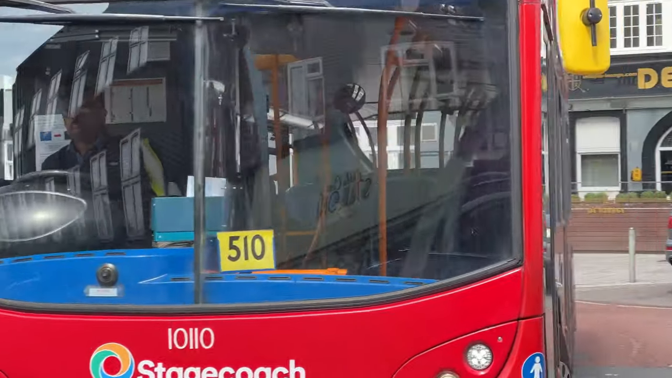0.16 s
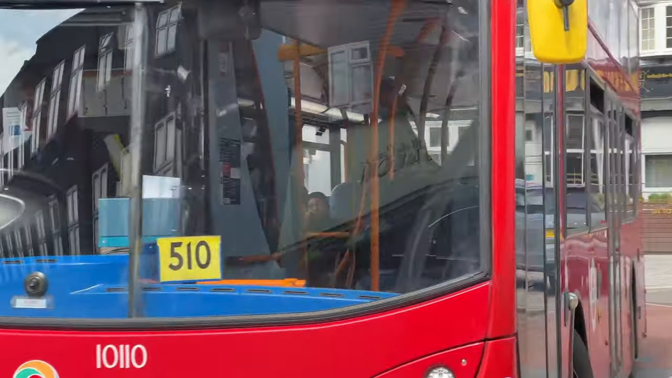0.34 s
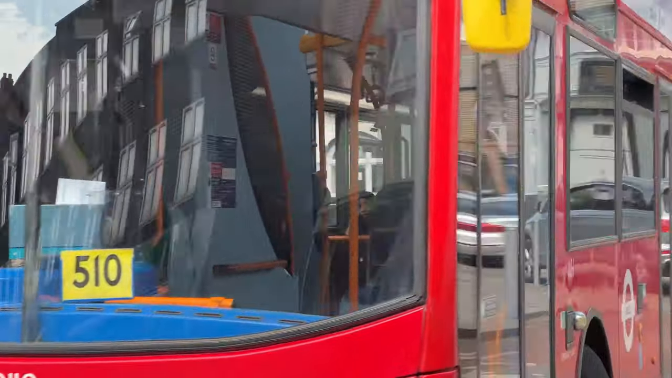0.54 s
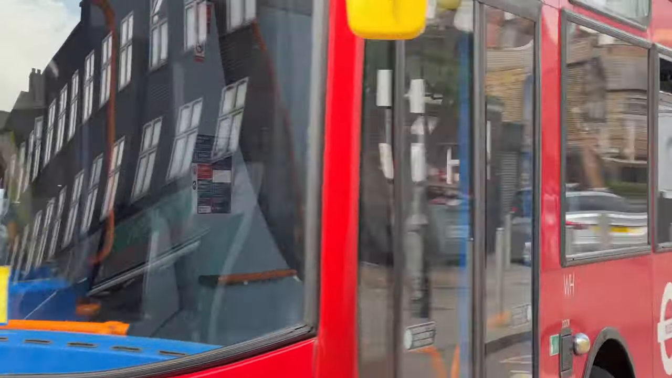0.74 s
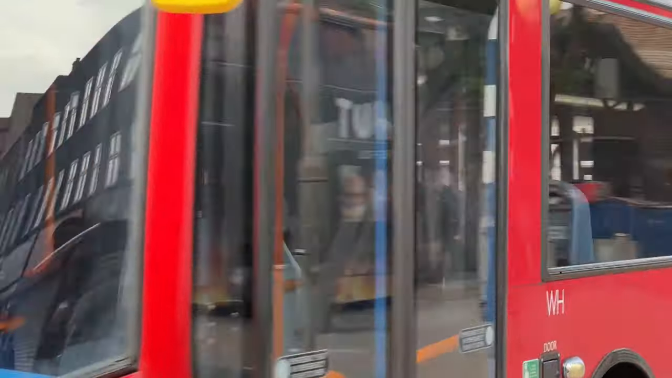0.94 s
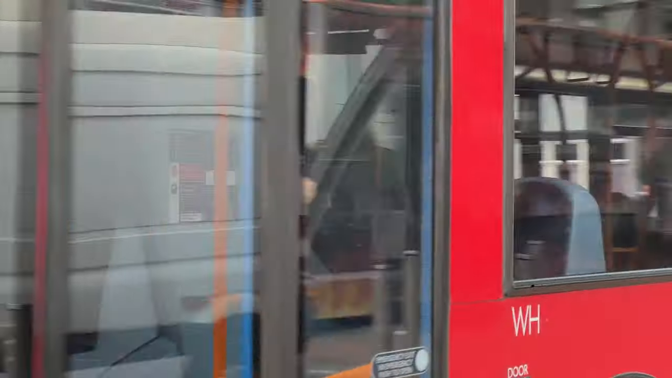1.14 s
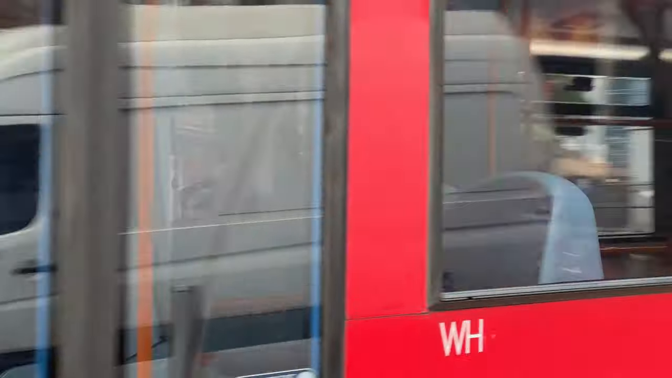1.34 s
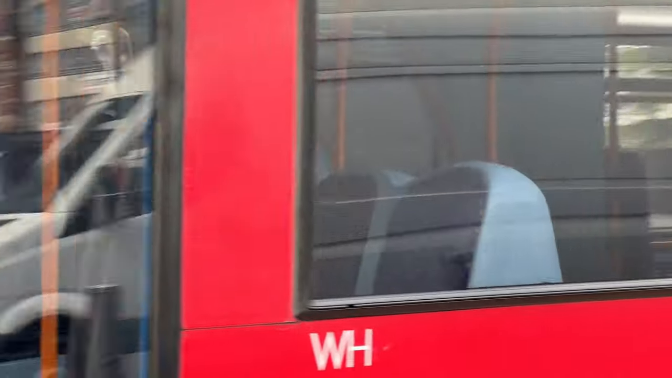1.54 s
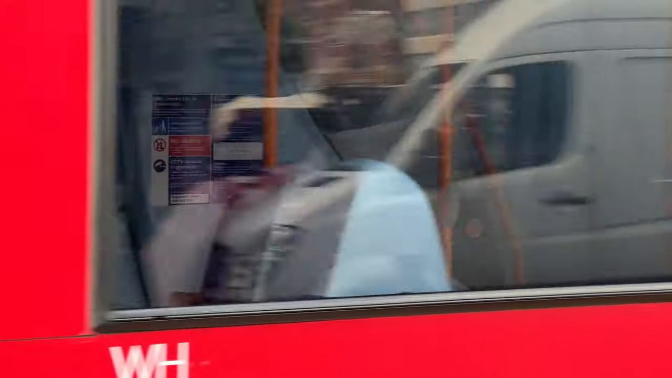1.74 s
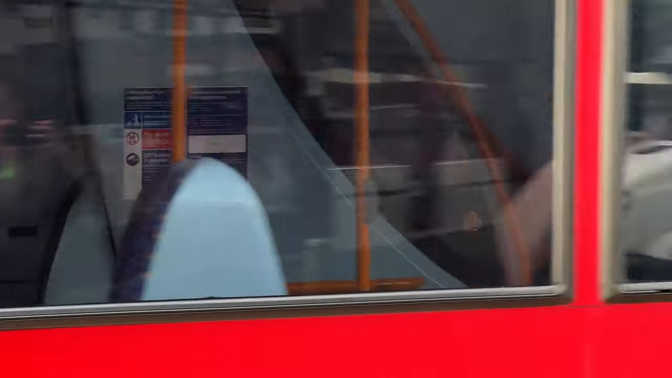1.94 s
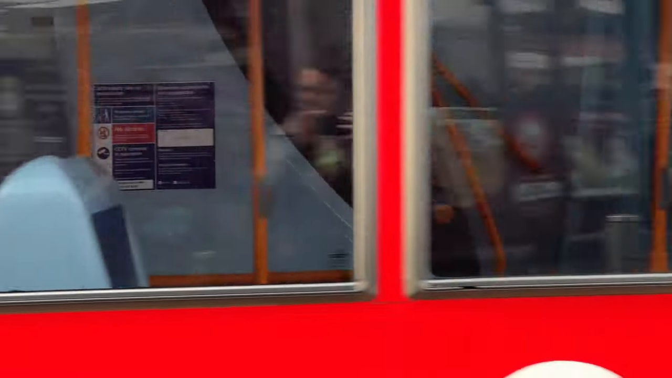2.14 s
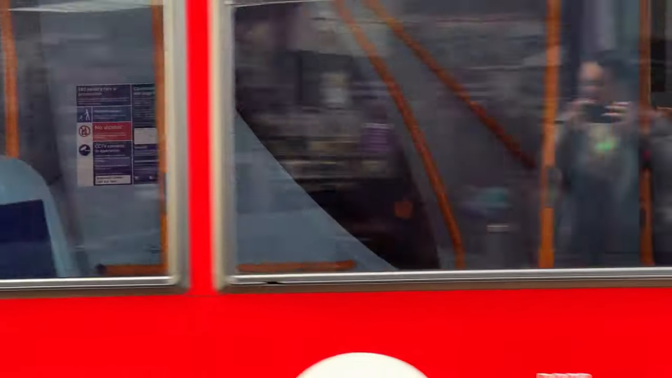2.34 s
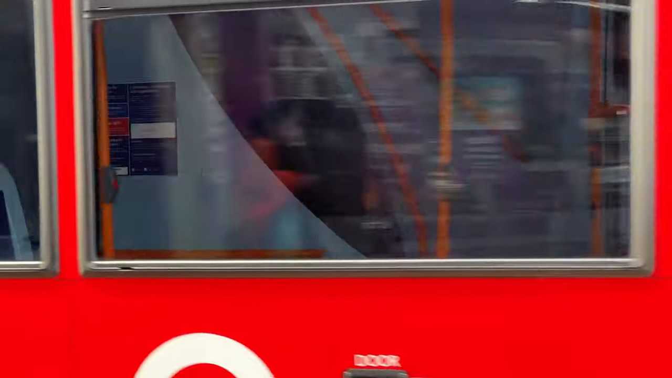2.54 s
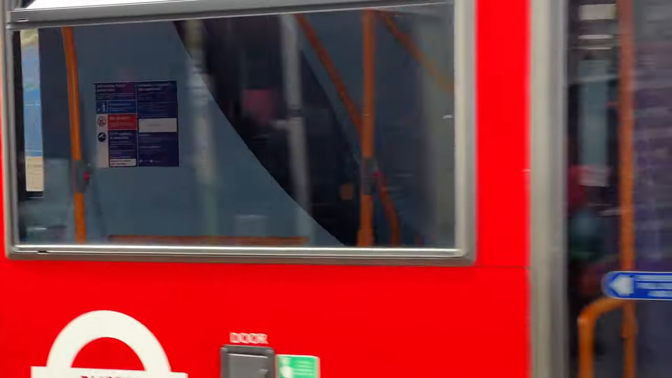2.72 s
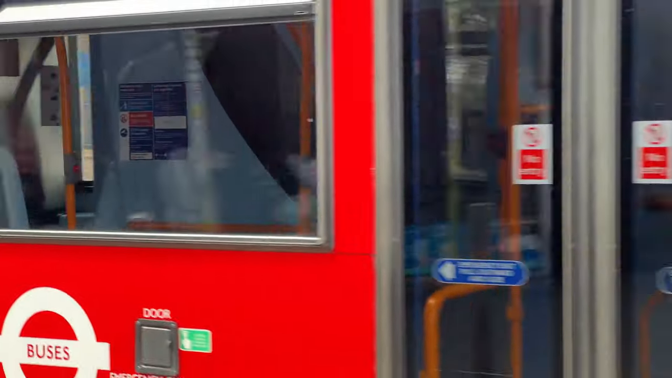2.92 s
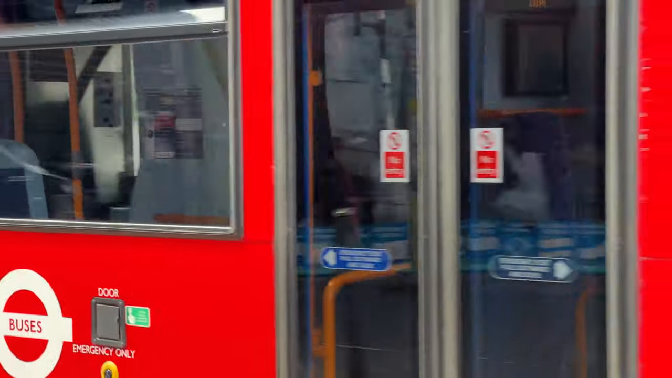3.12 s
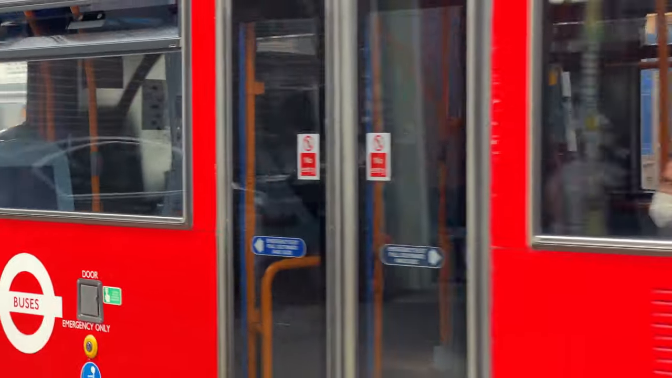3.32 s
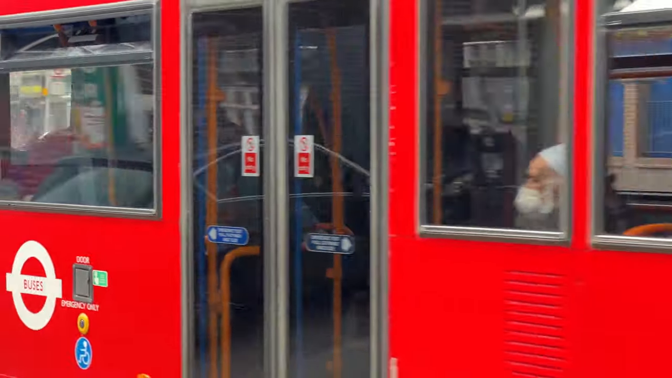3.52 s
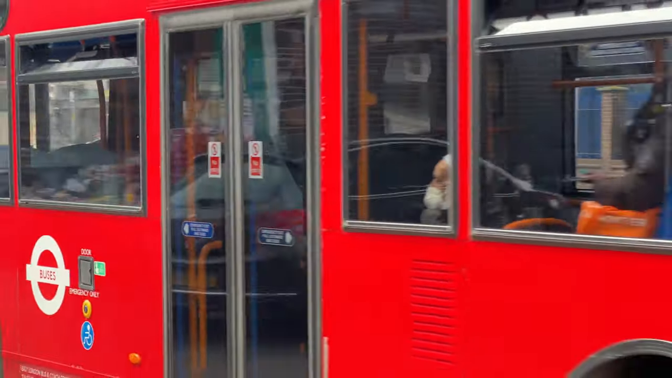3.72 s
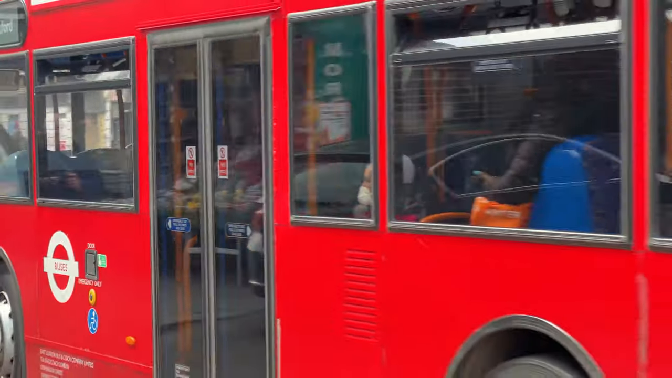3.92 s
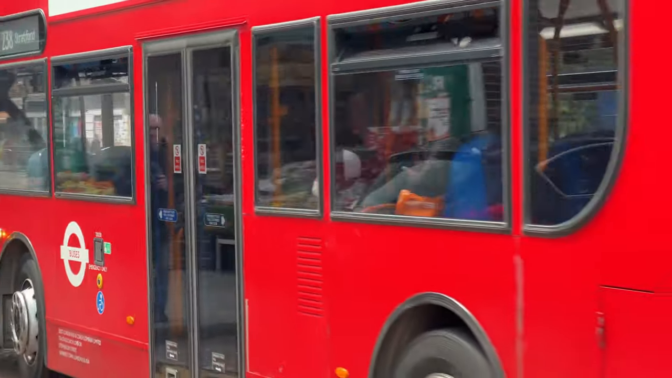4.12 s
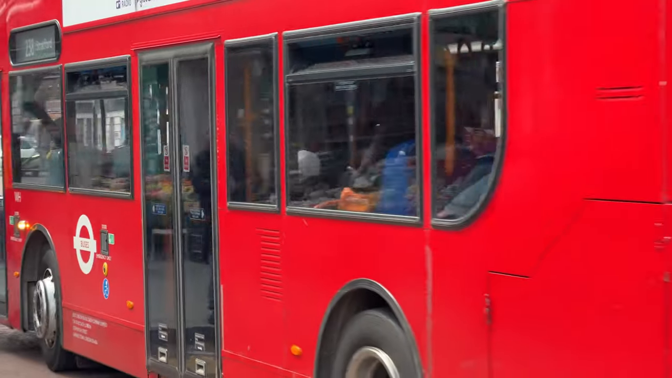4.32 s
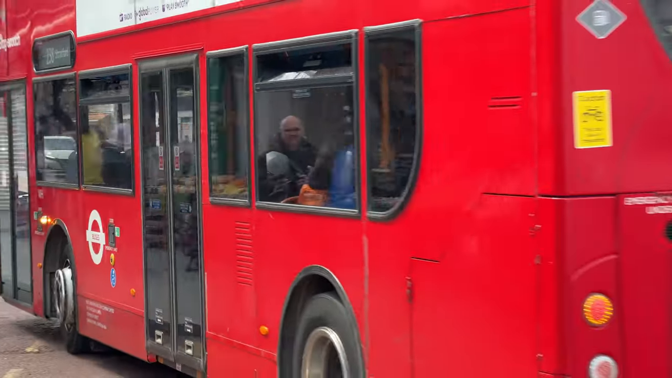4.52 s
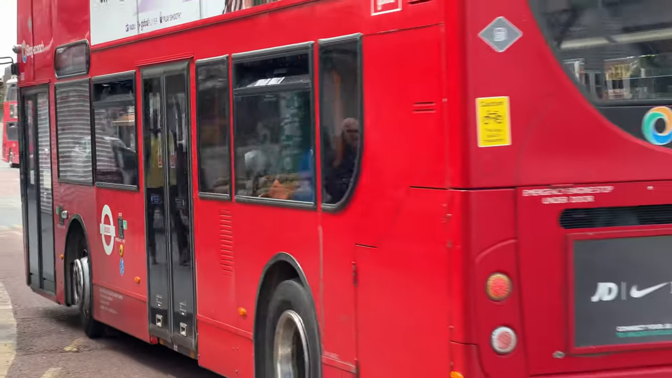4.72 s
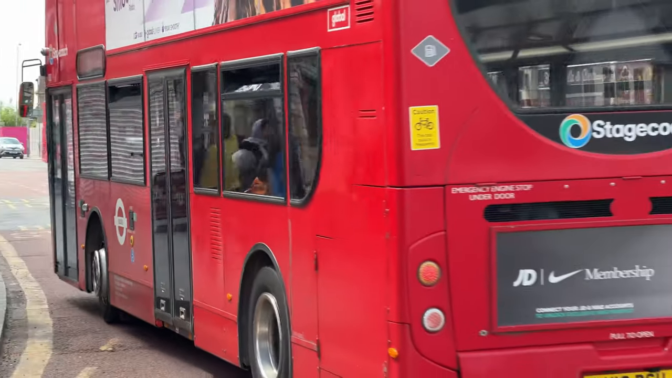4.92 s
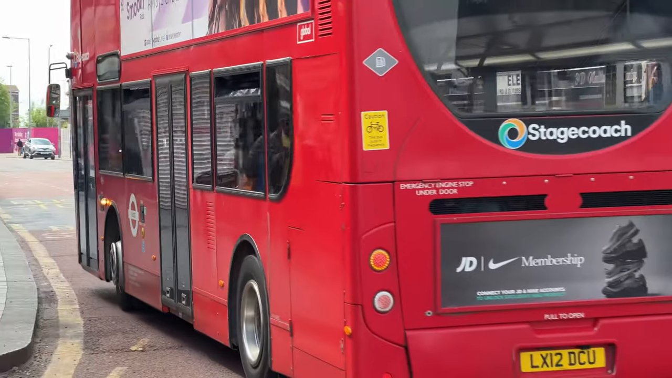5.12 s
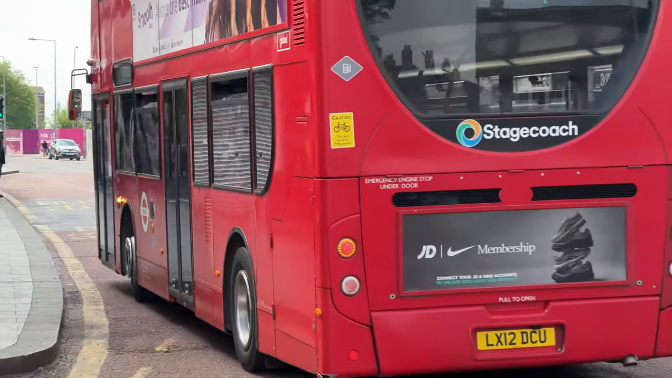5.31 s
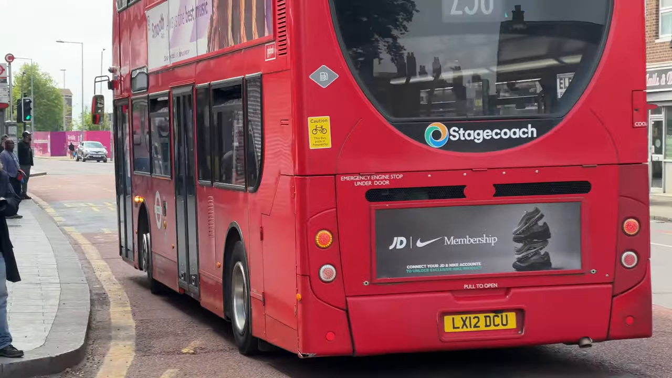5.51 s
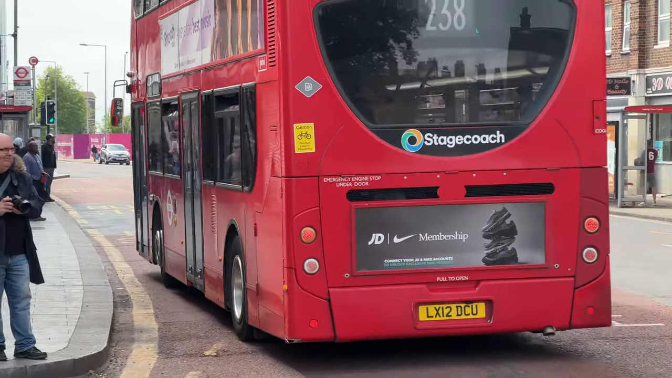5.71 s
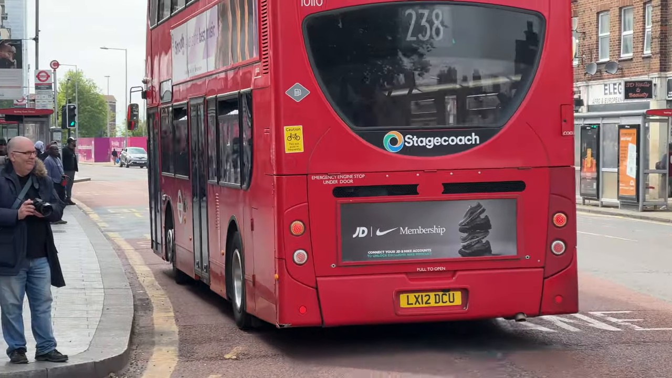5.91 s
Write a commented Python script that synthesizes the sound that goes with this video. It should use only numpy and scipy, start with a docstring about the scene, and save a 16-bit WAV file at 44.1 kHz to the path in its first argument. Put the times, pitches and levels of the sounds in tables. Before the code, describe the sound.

On a city street, close to the kerb, a heavy bus engine throbs by. First a muffled, slowly falling drone, then a burst of chattering door and body panels. The pitch bottoms out, a thin whistle sinks, and something ticks and knocks. The engine then pulls hard and rises, loud with air hiss, injector clatter, clacking covers and whining gears, before sinking to a low rumble with throbs and jolts.

```python
"""A droning six-cylinder diesel double-decker pulls past close by: the revs sag through a gear change, climb as
the rear engine draws level, and drop again as it leaves. Sines at crankshaft orders make the exhaust drone, the
block's shake and the gear whine; firing-pulsed noise makes the clatter; struck modes and noise bursts make the
loose panels. House fronts answer with a diffuse tail; a hand-held stereo microphone stands at the kerb."""
import sys
import numpy as np
from scipy import signal
from scipy.fft import rfft, irfft, next_fast_len
from scipy.io import wavfile
from scipy.ndimage import map_coordinates

SR = 44100
rng = np.random.default_rng(int(sys.argv[2]) if len(sys.argv) > 2 else 0)


def generate_wav(signal):
    """Clip the signal to [-1, 1] and save it as 16-bit WAV at the path in sys.argv[1]."""
    frames = np.transpose(np.atleast_2d(signal))
    scaled = np.clip(frames, -1, 1) * 32767
    pcm = np.round(scaled).astype(np.int16)
    wavfile.write(sys.argv[1], SR, pcm)


N = 267246

# engine orders of the firing tone and its companions: (multiples of the crankshaft speed)
FIRING_ORDERS = (3, 4, 6, 9, 12, 16)
# colour of the low exhaust and bodywork rumble: (frequency [Hz], relative level [dB])
RUMBLE_COLOUR = [(15, -30), (30, -12), (42, -15), (55, 3), (90, 3), (130, 1), (180, -7.5), (240, -10),
                 (300, -10), (500, -25.5), (1000, -94)]
# colour of struck panels: (frequency [Hz], relative level [dB])
PANEL_COLOUR = [(200, -4), (550, 10.5), (900, 3), (1200, 0), (1700, 2.5), (2400, 2), (3500, -0.5),
                (4600, -1.5), (7000, -6.5), (9000, -12), (12000, -15), (16000, -24)]


def amp(db):
    """Decibels to gain."""
    return 10 ** (np.asarray(db) / 20)


def unit(x):
    """Scaled to rms 1."""
    return x / np.sqrt(np.mean(x ** 2) + 1e-20)


def along(points, hz):
    """(Hz, value) points read on a log frequency axis."""
    f, v = np.transpose(points)
    return np.interp(np.log(hz + 1), np.log(f + 1), v)


def curves(rows):
    """One value per sample for each column after the time."""
    s, *cols = np.transpose(rows)
    return [np.interp(np.arange(N) / SR, s, c) for c in cols]


def wobble(rate):
    """A smooth random curve, rate knots a second."""
    knots = rng.standard_normal(int(N * rate / SR) + 4)
    return map_coordinates(knots, [np.arange(N) * rate / SR])


def filtered(x, response):
    """x times a complex response of frequency."""
    m = next_fast_len(N + SR // 4)
    return irfft(rfft(x, m) * response(np.fft.rfftfreq(m, 1 / SR)), m)[..., :N]


def noise(spectrum, crackle_db=0):
    """Coloured noise of rms 1; crackle breaks it into grains of unequal size."""
    grains, sizes = rng.standard_normal((2, N))
    crackling = grains * amp(crackle_db * np.minimum(sizes, 3))
    return unit(filtered(crackling, lambda hz: amp(along(spectrum, hz))))


def swell(s, db, half_s):
    """Gain that rises to a peak and fades again."""
    return amp(db) * np.exp(-((np.arange(N) / SR - s) / half_s) ** 2)


def bursts(rows, rise):
    """Envelope of blows (s, dB, t60 s) that rise quickly (one rise time for all, or one each) and die away."""
    envelope, t = np.zeros(N + SR), np.arange(SR // 2) / SR
    for (s, db, t60), rise_s in zip(rows, np.broadcast_to(rise, len(rows))):
        envelope[round(s * SR):][:len(t)] += amp(db - 60 * t / t60) * (1 - np.exp(-t / rise_s))
    return envelope[:N]


def ringing(blows, modes, blur_hz=15):
    """Blows (s, dB) ring (Hz, dB, t60 s) modes, at new strengths each time; loose contact blurs the pitch."""
    out, t = np.zeros(N + SR), np.arange(SR // 4) / SR
    for s, db in blows:
        for hz, level, t60 in modes:
            drift = np.cumsum(rng.standard_normal(len(t))) * np.sqrt(2 * np.pi * blur_hz / SR)
            gain = amp(db + level + rng.uniform(-4, 4) - 60 * t / t60)
            tone = np.sin(2 * np.pi * (hz * t + rng.random()) + drift)
            out[round(s * SR):][:len(t)] += gain * tone
    return out[:N]


def narrow(rows, width_hz):
    """A narrow band of noise that follows (s, Hz, dB) rows."""
    hz, db = curves(rows)
    phase = 2 * np.pi * np.cumsum(hz) / SR
    return amp(db) * unit(wobble(width_hz) * np.sin(phase) + wobble(width_hz) * np.cos(phase))


def passing(closest_s, level_db, half_s, fall_db, effort_share):
    """Level in dB of a source riding past on the bus: it falls with distance and follows the engine's effort."""
    # the engine works hard, eases off for the gear change, then pulls again: (time [s], effort [dB])
    effort = [(0, -1), (.8, 0), (1.25, 1.5), (1.75, 0.5), (2.0, -1), (2.55, -4.5), (2.92, -1), (3.2, -2),
              (3.85, 1), (4.6, 1), (5.4, 0.5), (6.06, 1)]
    distance = np.hypot(1, (np.arange(N) / SR - closest_s) / half_s)  # in units of the closest distance
    return level_db - fall_db * np.log10(distance) + effort_share * curves(effort)[0]


# Every ..._pass below lists the columns of passing(): (time when closest [s], level there before trims [dB],
# half-width [s], loss per tenfold distance [dB], share of the effort [dB per dB])


def bus():
    """Engine, gears, tyres and air; most follow the crankshaft, the engine's effort and the distance."""
    # revs through the gear change and the pull past the kerb: (time [s], crankshaft speed [turns/s])
    crank = [(0.0, 23.9), (0.35, 23.6), (0.65, 22.05), (1.2, 21.2), (1.45, 20.05), (1.95, 18.4),
             (2.2, 17.55), (2.42, 16.2), (2.55, 15.6), (2.7, 15.45), (2.9, 16.75), (3.15, 18), (3.69, 19.3),
             (3.92, 21.8), (4.15, 22.95), (4.55, 23.95), (4.8, 22.25), (4.95, 20.2), (5.25, 16.2),
             (5.7, 14.6), (6.06, 16.3)]
    # passes of the engine block and of the clatter: columns as for passing()
    block_pass = (3.5, -26.5, 1.1, 25.5, 1)
    clatter_pass = (4, -29, 0.66, 18, 0.94)
    speed, = curves(crank)
    turns = np.cumsum(speed) / SR
    block_db, clatter_db = passing(*block_pass), passing(*clatter_pass)
    beat = firing_beat(turns, t60=.045, scatter_db=2.5, cylinder_db=1.2, jitter=.0008, steady=1.5)
    engine = drone(turns, block_db, waver_db=0.7) + rumble() + floor_drum(beat)
    engine += amp(block_db) * block(speed, turns, even_db=6.0, half_db=-2.0, waver_db=4.5)
    engine += clatter(beat, clatter_db) + rear_vents(beat) + casing(beat)
    engine += valve_gear(turns, size_db=3.5, t60=.028)
    gears = amp(clatter_db - 6.0) * whirr(turns, slip=0.00023)
    gears += whine(speed, turns, flutter_db=1.8, swell_db=2, smear=.0065)
    return engine + gears + tyres(beat, block_db) + cooling_air(beat) + intake()


def firing_beat(turns, t60, scatter_db, cylinder_db, jitter, steady):
    """Envelope of rms 1: each firing is a burst, of a size set by its cylinder and by chance."""
    at = np.flatnonzero(np.diff(np.floor(3 * turns)))  # three firings a turn
    chance = rng.standard_normal((len(at), 2))
    cylinders = np.resize(unit(np.array([3.0, -1.0, 8.0, 4.0, -3.0, 7.0])), len(at))
    at = np.clip(at + jitter * SR * chance[:, 0], 0, N - 1).astype(int)
    blows = np.bincount(at, amp(scatter_db * chance[:, 1] + cylinder_db * cylinders), N)
    ring = amp(-60 * np.arange(SR // 10) / SR / t60)
    return unit(unit(signal.fftconvolve(blows, ring)[:N]) + steady)


def drone(turns, block_db, waver_db, size=40):
    """Three firings a turn and their overtones, as clean tones; an order booms when it meets a resonance."""
    # the firing tone at the kerb: (time [s], level [dB])
    firing = [(0, -35), (.5, -46), (1.0, -31), (1.4, -23.5), (2.05, -22.5), (2.5, -36), (2.95, -22),
              (3.25, -25.5), (3.5, -21.5), (4.6, -24), (4.85, -30.5), (6.06, -38)]
    # the orders above the firing tone: (level against the engine block [dB])
    overtone_db = [-13, -8, -8, -15, -13]
    # exhaust and bodywork boom as an order sweeps through a resonance:
    # (time [s], order [per turn], level [dB], half length [s])
    booms = [(0.42, 4, -25, 0.32), (0.36, 6, -34, 0.24), (0.56, 16, -46, 0.2), (0.86, 12, -31.5, 0.26),
             (1.15, 23, -39, 0.25), (1.342, 6, -30, 0.16), (1.4, 18, -34.5, 0.075), (1.59, 14, -27.5, 0.19),
             (1.785, 4, -24, 0.061), (2.23, 36, -41.5, 0.12), (2.3, 22, -36, 0.14), (2.274, 16, -27, 0.16),
             (2.6, 6, -23, 0.24), (2.614, 18, -33.5, 0.29), (2.5, 30, -36, 0.18), (4.76, 21, -37.5, 0.28),
             (4.5, 23, -38, 0.22), (2.62, 14, -33.5, 0.26), (2.7, 12, -34, 0.16), (2.716, 29, -35.5, 0.12),
             (2.93, 16, -29.5, 0.14), (2, 9, -29, 0.052), (3.2, 9, -26, .06), (3.1, 12, -34, 0.11),
             (3.13, 10, -27.5, 0.28), (3.4, 9, -36, 0.27), (3.34, 20, -33.5, 0.11), (3.5, 26, -45, 0.5),
             (3.68, 24, -39.5, 0.1), (3.75, 18, -28, 0.088), (3.93, 8, -23.5, .11), (4.05, 9, -28, 0.18),
             (4.4, 18, -38, 0.38), (4.1, 16, -34, 0.19), (4.2, 12, -21.5, 0.41), (4.7, 12, -25.5, 0.24),
             (4.07, 20, -39, .1), (3.76, 14, -33, 0.064), (4.36, 4, -25.5, 0.46), (4.33, 6, -25.5, 0.49),
             (4.55, 6, -26, 0.19), (4.807, 4, -20.5, 0.13), (5.012, 14, -23.5, 0.045), (5.3, 9, -26, 0.077),
             (5.6, 6, -27.5, 0.18), (5.903, 9, -28.5, 0.12)]
    phase = rng.random(size)
    levels = [curves(firing)[0]] + [block_db + db for db in overtone_db]
    gains = [(order, amp(db + waver_db * wobble(7))) for order, db in zip(FIRING_ORDERS, levels)]
    gains += [(round(order), swell(s, db, half_s)) for s, order, db, half_s in booms]
    tones = sum(gain * np.sin(2 * np.pi * (order * turns + phase[order])) for order, gain in gains)
    return np.sqrt(2) * tones


def rumble():
    """Low noise of the exhaust and bodywork, swelling with the pass."""
    # pass of the rumble: columns as for passing()
    rumble_pass = (4, -20, 2.5, 13, 0.77)
    return amp(passing(*rumble_pass) - 6) * noise(RUMBLE_COLOUR)


def floor_drum(beat):
    """The long floor drums between the axles: low noise that pulses with the firings."""
    # resonances of the floor: (frequency [Hz], relative level [dB])
    floor_colour = [(60, -80), (130, -25), (168, -3), (200, -2), (230, 0), (275, -30), (600, -100)]
    # pass of the floor: columns as for passing()
    floor_pass = (3, -32, 0.75, 42, 0.5)
    return amp(passing(*floor_pass)) * unit(beat + 2) * noise(floor_colour)


def block(speed, turns, even_db, half_db, waver_db, count=84):
    """Unequal cylinders shake the block at every half order; its resonances colour the comb."""
    # resonances of the block: (frequency [Hz], relative level [dB])
    block_colour = [(30, -40), (70, -8), (130, 4.5), (175, 7), (235, 0), (280, 4.5), (320, -5), (370, 0),
                    (480, -2.5), (600, -8.5), (900, -15.5), (1600, -36), (3000, -34)]
    out, coarse = np.zeros(N), np.arange(0, N, SR // 12)
    for k in range(4, count):  # k counts half orders
        if k / 2 not in FIRING_ORDERS:
            weight_db = half_db * (k % 2) + even_db * (k % 4 == 0)
            db = along(block_colour, speed[coarse] * k / 2) + weight_db
            db = db + waver_db * rng.standard_normal(len(coarse))
            gain = np.interp(np.arange(N), coarse, amp(db))
            out += gain * np.sin(np.pi * k * turns + 2 * np.pi * rng.random())
    return unit(out)


def clatter(beat, clatter_db):
    """The injectors clatter: bright noise that pulses with the firings."""
    # colour of the clatter: (frequency [Hz], relative level [dB])
    clatter_colour = [(300, 10.5), (700, 7), (1100, -0.5), (1600, 5), (1900, 2), (2150, 3), (2500, 0.5),
                      (3200, 1.5), (4300, -5), (6000, -21), (8500, -29), (12000, -25), (16000, -61)]
    return amp(clatter_db - 2.5 + 2.3 * wobble(15)) * beat * noise(clatter_colour)


def rear_vents(beat):
    """Firing-pulsed noise through the resonances heard at the rear vents."""
    # resonances heard through the vents: (frequency [Hz], relative level [dB])
    vent_colour = [(1750, -32), (2050, -6), (2170, 2.5), (2340, -10), (2560, -4.5), (2900, -17), (3350, -9),
                   (3720, -3.5), (4100, -10), (4600, -18), (6000, -42)]
    # pass of the vents: columns as for passing()
    vents_pass = (4.2, -35.5, .5, 22.5, 1)
    return amp(passing(*vents_pass) + 1.4 * wobble(20)) * beat * noise(vent_colour)


def casing(beat, dull_hz=7000):
    """Combustion noise, pulsing with the firings, rings two broad modes of the casing."""
    # the casing rings on as the bus is heard from ahead and from behind: (time [s], level [dB])
    casing_level = [(0, -49.5), (1, -44), (2, -42), (3.5, -51), (4.2, -42), (5, -37), (5.7, -42),
                    (6.06, -46)]
    # modes of the casing: (frequency [Hz], width [Hz], relative level [dB])
    casing_modes = [(716, 64, 5), (838, 63, 1.5)]

    def response(f):
        modes = sum(amp(db) * 1j * f * width / (hz * hz - f * f + 1j * f * width)
                    for hz, width, db in casing_modes)
        return modes / (1 + (f / dull_hz) ** 4)

    return amp(curves(casing_level)[0]) * unit(filtered(beat * rng.standard_normal(N), response))


def valve_gear(turns, size_db, t60, count=12):
    """Valves and injectors tap count times a turn; every tap rings the same steel parts, in a new mixture."""
    # steel parts of the valve gear: (frequency [Hz], relative level [dB])
    steel_parts = [(2080, -2), (2210, -4), (2340, -7), (2530, 2), (2700, -1.5), (2890, -5), (3050, -2),
                   (3240, 1.5), (3450, 1.5)]
    # pass of the taps: columns as for passing()
    taps_pass = (3.5, -35, 0.94, 38, 2.8)
    at = np.flatnonzero(np.diff(np.floor(count * turns)))
    chance, t = rng.standard_normal((len(at), len(steel_parts) + 2)), np.arange(SR // 20) / SR
    start = np.clip(at + SR * 0.000902 * chance[:, 0], 0, N - 1).astype(int)
    out = np.zeros(N)
    for (hz, db), share in zip(steel_parts, chance[:, 2:].T):
        taps = np.bincount(start, share * amp(size_db * chance[:, 1]), N)
        ring = amp(db - 60 * t / t60) * np.sin(2 * np.pi * hz * t)
        out += signal.oaconvolve(taps, ring)[:N]
    return amp(passing(*taps_pass)) * unit(out)


def whirr(turns, slip, size=1024):
    """Gears and valves repeat one random pattern each turn: a dense comb of faint gliding lines."""
    # colour of the whirr: (frequency [Hz], relative level [dB])
    whirr_colour = [(400, 6.5), (700, 5), (1200, 7), (1700, 7.5), (2150, -13), (2600, 5.5), (3400, 5.5),
                    (4200, 2.5), (7000, -10), (12000, -28)]
    angle = turns + slip * wobble(20)
    pattern = map_coordinates(rng.standard_normal(size), [angle % 1 * size], mode="grid-wrap")
    return unit(filtered(pattern, lambda hz: amp(along(whirr_colour, hz))))


def whine(speed, turns, flutter_db, swell_db, smear):
    """Gear tones, coloured by their case, sing out now and then; backlash makes them flutter."""
    # tooth orders of the gears: (multiples of the crankshaft speed)
    gear_orders = (50, 72, 90, 108, 111, 127, 144, 150)
    # strength of each gear tone: (relative level [dB])
    gear_db = [-6, -1.5, -11, -11, -16, -15, -9.5, -15]
    # what the gear case radiates: (frequency [Hz], relative level [dB])
    gear_case = [(800, -3), (1180, -3.5), (1650, -2), (2250, 0), (2800, 7), (3200, -6), (3500, 8)]
    # a gear tone sings out for a moment: (time [s], order [per turn], level [dB], half length [s])
    sings = [(.05, 144, -58, .08), (.4, 144, -58, .06), (.51, 144, -48, .04), (.67, 144, -43, .05),
             (.95, 144, -46, .04), (1.12, 144, -45, .045), (1.36, 144, -51, .08), (2.15, 144, -49, .06),
             (2.44, 72, -40.5, .17), (3.08, 144, -39, .04), (3.33, 144, -37, .14), (3.8, 144, -35.5, .16),
             (4.1, 144, -41, .1), (3.88, 108, -37, .1), (3.88, 72, -41, .08), (4.26, 72, -38, .13),
             (4.24, 108, -38, .14), (4.17, 90, -37, .05), (4.4, 90, -39, .05), (4.57, 90, -38, .06),
             (4.55, 111, -42, .13), (4.22, 127, -44, .06), (4.38, 150, -43, .06), (4.42, 144, -43, .12),
             (4.74, 144, -41.5, .07), (4.68, 50, -43, .14), (4.96, 144, -40.5, .045)]
    # pass of the gearbox, growing to the end: columns as for passing()
    gearbox_pass = (7, -45, 3, 17, 3.5)
    backlash = smear * (wobble(30) + .5 * wobble(110))  # radians of play at the crankshaft
    gearbox_db, out = passing(*gearbox_pass), np.zeros(N)
    for order, db in zip(gear_orders, gear_db):
        gain = amp(gearbox_db + db + along(gear_case, order * speed) + swell_db * wobble(10))
        gain = gain + sum(swell(s, peak_db, half_s) for s, k, peak_db, half_s in sings if k == order)
        out += gain * amp(flutter_db * wobble(40)) * np.sin(order * (2 * np.pi * turns + backlash))
    return out


def tyres(beat, block_db):
    """Road noise of the tyres, with a slight pulse of the firings."""
    # colour of the road noise: (frequency [Hz], relative level [dB])
    road_colour = [(100, -45), (250, -2), (380, -2), (550, -8.5), (800, -11), (1200, -12.5), (2500, -26),
                   (8000, -62)]
    return amp(block_db - 2.5) * noise(road_colour) * unit(beat + 4.5)


def cooling_air(beat):
    """Cooling air rushes with a slight pulse of the firings; a soft puff joins it on the approach."""
    # colour of the air: (frequency [Hz], relative level [dB])
    air_colour = [(500, -4.5), (2000, 6), (3000, -9.5), (4500, 4), (6500, 2), (7300, 1.5), (8600, -4),
                  (10000, -7), (12000, -7.5), (16000, -23)]
    # pass of the air: columns as for passing()
    air_pass = (4, -35, 1.0, 35, 0.1)
    # a soft hiss of air while the bus still approaches: (time [s], level [dB], half length [s])
    puff = (0.34, -51.5, 0.3)
    gain = amp(passing(*air_pass) + 0.4 * wobble(27)) + swell(*puff)
    return gain * unit(beat + 1.0) * noise(air_colour)


def intake():
    """The turbocharger draws air through the side grille: crackling hiss, with a squeak and a whistle."""
    # hiss of the intake, loudest as the side grille passes: (time [s], level [dB])
    intake_level = [(0, -59), (2.1, -44.5), (2.5, -44.5), (2.9, -37.5), (3.3, -33.5), (3.7, -35.5),
                    (4.1, -44), (4.8, -68), (6.06, -67)]
    # colour of the grille: (frequency [Hz], relative level [dB])
    grille_colour = [(1500, -51), (2400, 1), (2700, 4.5), (2950, 8), (3300, -4), (4200, -8.5), (5600, -4),
                     (8000, -5), (10000, -14.5), (13000, -24), (16000, -21)]
    thin = squeak(patchy_db=8) + whistle(flutter_db=2, smear=.7)
    hiss = amp(1.6 * wobble(29.98)) * noise(grille_colour, crackle_db=7.0)
    return amp(curves(intake_level)[0]) * hiss + thin


def squeak(patchy_db):
    """A narrow band of noise that comes and goes in brief pieces."""
    # a thin squeak beside the intake, perhaps a belt: (time [s], frequency [Hz], level [dB])
    squeak_path = [(0, 6950, -70), (1.7, 7040, -61), (2.3, 6970, -51), (2.65, 6860, -56), (3.3, 6790, -43),
                   (3.65, 6800, -43), (3.95, 6820, -53), (4.3, 6920, -44), (5, 6950, -60),
                   (6.06, 6930, -56)]
    return unit(amp(patchy_db * np.tanh(wobble(60)))) * narrow(squeak_path, width_hz=230)


def whistle(flutter_db, smear):
    """One sinking, slightly unsteady tone."""
    # sinks during the gear change, perhaps the turbocharger: (time [s], frequency [Hz], level [dB])
    whistle_path = [(2.38, 2940, -70), (2.47, 2930, -47), (2.62, 2905, -48), (2.78, 2870, -47),
                    (2.89, 2800, -41), (2.96, 2800, -70)]
    hz, db = curves(whistle_path)
    tone = np.sin(2 * np.pi * np.cumsum(hz) / SR + smear * wobble(70))
    return np.sqrt(2) * amp(db + flutter_db * wobble(30.3)) * tone


def rattles():
    """Panels chatter and ring against their frames: crackling noise, struck modes and a low knock."""
    # loose door and body panels: (time [s], level [dB], low knock against it [dB], t60 [s],
    # note of the part that is hit [Hz], level of the note [dB])
    panel_hits = [(1.172, -31, 7.5, 0.23, 1760, -36), (1.271, -27, 2, 0.087, 6950, -40),
                  (1.549, -18, -5.5, 0.082, 1696, -24), (1.557, -30, -3, 0.067, 597, -20),
                  (1.579, -32, 6, 0.23, 3250, -26), (1.642, -20.5, -6, 0.087, 1710, -22.5),
                  (1.652, -25, -6, 0.35, 2720, -33), (1.706, -24.5, -1, 0.15, 4130, -34),
                  (1.744, -17, -10, 0.17, 880, -21), (1.755, -34, -6, .1, 2130, -24),
                  (1.776, -35, 7, 0.12, 3340, -33), (2.179, -26, 1, 0.08, 7000, -43)]
    # modes of the panels: (frequency [Hz], relative level [dB], t60 [s])
    panel_modes = [(625, 1, 0.14), (886, 5, 0.064), (1560, -8, .12), (1740, 1, 0.041), (2067, -6, 0.095),
                   (2800, 1, 0.1), (3170, -3, 0.1), (3670, -3, 0.065), (4900, -15, 0.054),
                   (5900, -22, 0.086), (7100, -1, 0.079)]
    # colour of the low knock: (frequency [Hz], relative level [dB])
    knock_colour = [(60, -11), (190, 8.5), (330, -3), (600, -12), (1500, -35), (5000, -70)]
    chatter = amp(1.5 * wobble(500)) * noise(PANEL_COLOUR, crackle_db=8)
    panels = bursts([(s + .001, db, t60) for s, db, _, t60, _, _ in panel_hits], rise=.0011) * chatter
    ring = ringing([(s + 0.0018, db) for s, db, *_ in panel_hits], panel_modes)
    notes = sum(ringing([(s + 0.0022, db)], [(hz, 0, .07)], blur_hz=80) for s, *_, hz, db in panel_hits)
    frame_blows = [(s, db + low_db, .22) for s, db, low_db, *_ in panel_hits]
    frames = bursts(frame_blows, rise=0.0028) * noise(knock_colour)
    return amp(-3.5) * panels + amp(-15) * ring + notes + amp(3.0) * frames


def clacks():
    """Covers clack in the engine bay: short noise bursts and struck modes."""
    # sharp clacks from the engine bay: (time [s], level before trims [dB])
    clack_hits = [(3.1, -28), (3.155, -26.5), (3.261, -24), (3.319, -25.5), (3.425, -19), (3.48, -23),
                  (3.529, -25), (3.559, -24), (3.586, -23.5), (3.636, -21), (3.882, -23.5), (4.021, -26),
                  (4.282, -27), (4.535, -37)]
    # colour of the bay: (frequency [Hz], relative level [dB])
    bay_colour = [(500, -23), (1500, 1), (2700, 7), (3400, 1), (4500, 1), (7000, -2.5), (10000, -12),
                  (16000, -34)]
    # engine bay covers: (frequency [Hz], relative level [dB], t60 [s])
    cover_modes = [(2360, -7, 0.074), (2740, -1, 0.036), (3175, 4.5, 0.043), (6270, -11, .07),
                   (7020, -3, 0.083)]
    cracks = bursts([(s, db, .06) for s, db in clack_hits], rise=0.00036) * noise(bay_colour)
    return amp(-1.5) * cracks + amp(-6.5) * ringing(clack_hits, cover_modes)


def jolts():
    """The body shudders after each bump: a dull noise burst."""
    # the wheels go over bumps: (time [s], level [dB], t60 [s])
    bumps = [(1.745, -26, 0.37), (2.84, -23.5, 0.43), (5.375, -26, 0.16), (5.68, -24, 0.51),
             (5.75, -29, 0.32), (5.84, -26, .12)]
    # colour of the shudder: (frequency [Hz], relative level [dB])
    shudder_colour = [(25, -14), (50, 3), (85, 0), (200, -11), (400, -4), (800, -11), (2000, -17.5),
                      (6000, -31), (12000, -60)]
    return bursts(bumps, rise=0.016) * noise(shudder_colour)


def throbs():
    """Brief low surges of the bodywork's rumble."""
    # low throbs as the bus draws away: (time [s], level [dB], half length [s])
    surges = [(5.175, -27, 0.014), (5.51, -26, 0.02), (5.565, -24, .02), (5.656, -26, 0.018),
              (5.716, -20, 0.026)]
    return sum(swell(s, db, half_s) for s, db, half_s in surges) * noise(RUMBLE_COLOUR)


def chinks():
    """Loose steel parts chink as the engine bay goes by, each on its own rough note."""
    # loose steel parts: (time [s], note [Hz], level before trim [dB])
    steel_hits = [(3.1, 2540, -26.5), (3.365, 2680, -26), (3.426, 2650, -23), (3.52, 3050, -26),
                  (3.553, 2920, -26), (3.571, 2730, -32), (3.629, 3320, -24), (3.63, 2290, -21),
                  (3.722, 2930, -36), (3.76, 3297, -26), (3.785, 2217, -23), (3.845, 1540, -28),
                  (3.865, 3062, -30), (3.895, 2310, -27), (4.025, 2236, -25), (4.107, 3290, -31),
                  (4.155, 2070, -25)]
    return sum(ringing([(s, db)], [(hz, -1, .11)], blur_hz=45) for s, hz, db in steel_hits)


def ticks():
    """Short bright ticks with a thin ping, each followed by a low thud of decaying sines."""
    # bright ticks: (time [s], level [dB], ping level [dB], thud level [dB], rise [s], t60 [s])
    tick_hits = [(2.877, -23.5, -23, -15, .001, 0.11), (2.928, -30, -35, -32, .001, .09),
                 (2.975, -21.5, -28, -26, .0015, 0.11), (5.303, -29, -31, -45, .001, .08),
                 (5.743, -22.5, -28.5, -10.5, 0.0071, 0.13)]
    # colours of the tick and of the ping: (frequency [Hz], relative level [dB])
    tick_colour = [(1000, 7.5), (4000, 3), (7000, 3.5), (8200, 3), (8900, -1), (9700, -4), (12000, -7),
                   (16000, -16)]
    ping_colour = [(6000, -35), (7700, -5), (8400, 10), (9200, -2), (10500, -2), (13000, -26), (16000, -40)]
    # modes of the thud: (frequency [Hz], relative level [dB], t60 [s])
    thud_modes = [(104, 1.5, 0.09), (179, 3.5, .06)]
    tick_blows = [(s, db, t60) for s, db, *_, t60 in tick_hits]
    bright = bursts(tick_blows, rise=[row[4] for row in tick_hits]) * noise(tick_colour)
    ping = bursts([(s, db, .05) for s, _, db, *_ in tick_hits], rise=0.00073) * noise(ping_colour)
    thuds = np.zeros(N)
    for s, _, _, db, _, _ in tick_hits:
        for hz, level, t60 in thud_modes:
            envelope = bursts([(s + 0.0037, db + level, t60)], rise=0.0017)
            thuds += envelope * np.sin(2 * np.pi * hz * (np.arange(N) / SR - s - .004))
    return bright + ping + thuds


def knocks():
    """A soft contact, a blurred note and a few short modes of a hollow part; little treble gets out."""
    # hollow knocks under the body: (time [s], level before trims [dB], note [Hz])
    knock_hits = [(3.057, -23, 1070), (3.063, -17, 1040), (3.0645, -16, 650), (3.072, -21.5, 900)]
    # modes of the hollow part: (frequency [Hz], relative level [dB], t60 [s])
    hollow_modes = [(585, 0, 0.056), (685, 8, 0.054), (841, -10, 0.034), (1040, 3, 0.038),
                    (1160, -2, 0.031)]
    blows = [(s, db) for s, db, _ in knock_hits]
    crack = amp(-7.5) * bursts([(s, db, .016) for s, db in blows], rise=0.0004) * noise(PANEL_COLOUR)
    body = amp(-16) * ringing(blows, hollow_modes, blur_hz=110)
    notes = sum(ringing([(s, db)], [(hz, 0, .045)], blur_hz=60) for s, db, hz in knock_hits)
    return crack + filtered(body + notes, lambda hz: 1 / (1 + (hz / 1800) ** 4))


def street(x):
    """House fronts return a diffuse tail, different on each side, that is weak in the bass."""
    # how long the street rings: (frequency [Hz], t60 [s])
    street_t60 = [(100, 1), (1500, 0.74), (12000, 0.29)]
    # the street's answer: (frequency [Hz], level [dB])
    echo_colour = [(100, -25), (250, -16.5), (600, -10.5), (1200, -8.5), (2500, -12.5), (8000, -41)]
    hz, t, z = signal.stft(rng.standard_normal((2, SR // 2)), SR, nperseg=256)
    decay = amp(-60 * t / along(street_t60, hz)[:, None])
    tail = signal.istft(z * decay, SR, nperseg=256)[1]
    delayed = np.pad(x, (600, 0))[None]  # samples of extra path by way of the house fronts
    answer = signal.fftconvolve(delayed, tail / np.linalg.norm(tail[0]), axes=1)[:, :N]
    return filtered(answer, lambda hz: amp(along(echo_colour, hz)))


def scene():
    """The bus close by, and the street around it."""
    direct = bus() + rattles() + clacks() + jolts() + throbs() + chinks() + ticks() + knocks()
    return direct + street(direct)


def record(dry):
    """The two microphone ports differ in phase and level; nothing passes above the band limit."""
    # phase between the ports: (frequency [Hz], lead of the left port [rad])
    port_phase = [(0, 0), (400, 0), (900, .35), (1450, -.9), (2200, 0), (3100, .7), (5250, .1), (8400, 0),
                  (9200, -1.1), (10200, -3.14), (12200, -6.28), (13800, -9.42), (15400, -12.57)]
    # level between the ports: (frequency [Hz], left minus right [dB])
    port_tilt = [(250, 0), (600, 1), (900, 1), (1250, 4.5), (1700, 0.5), (2100, -0.5), (3000, -.5),
                 (4500, -0.5)]
    # band limit of the microphone [Hz]
    top_hz = 15850
    side = np.array([[1], [-1]]) / 2  # each port takes half the difference

    def ports(hz):
        lead = side * np.interp(hz, *np.transpose(port_phase))
        return amp(side * along(port_tilt, hz)) * np.exp(1j * lead) * (hz < top_hz)

    return filtered(dry, ports)


dry = scene()
out = record(dry)
generate_wav(out)
```